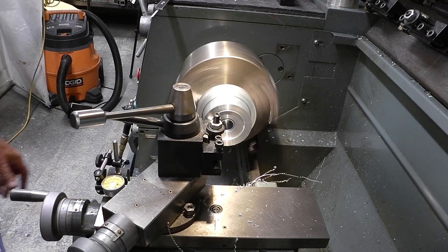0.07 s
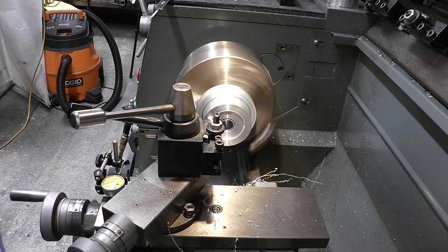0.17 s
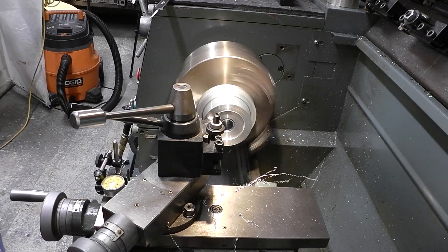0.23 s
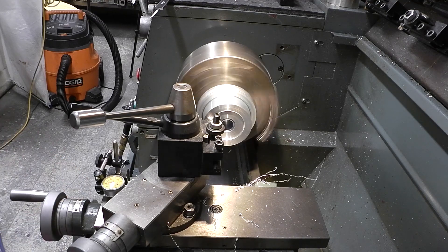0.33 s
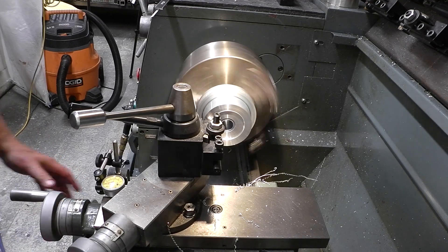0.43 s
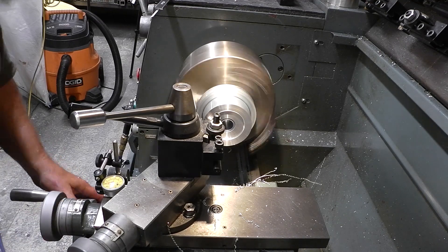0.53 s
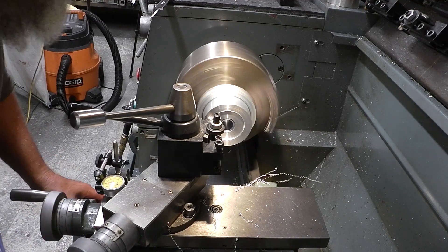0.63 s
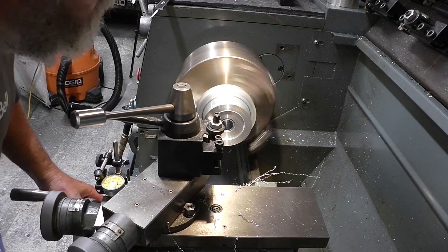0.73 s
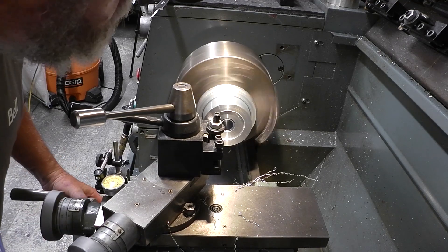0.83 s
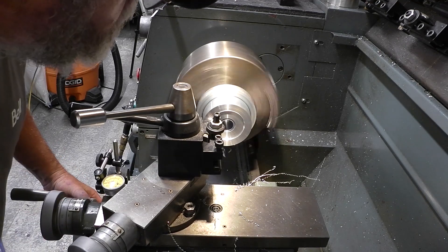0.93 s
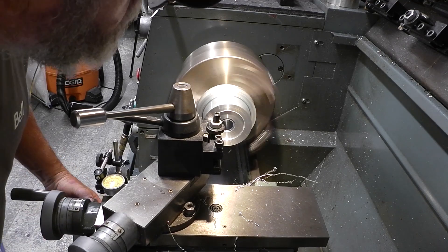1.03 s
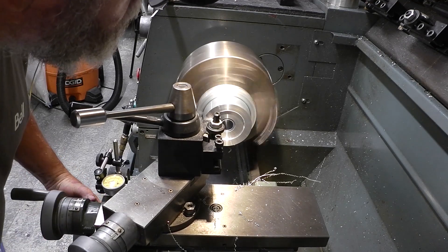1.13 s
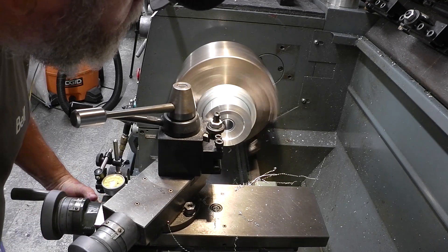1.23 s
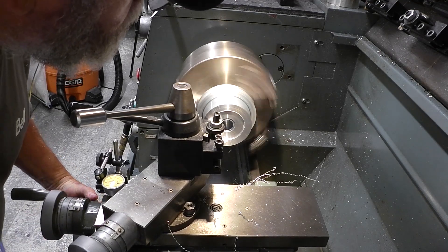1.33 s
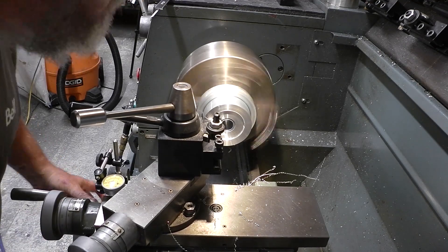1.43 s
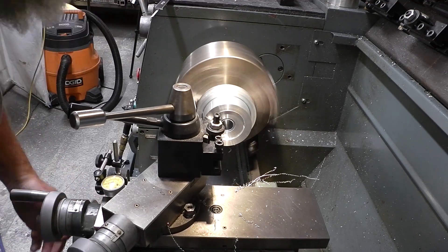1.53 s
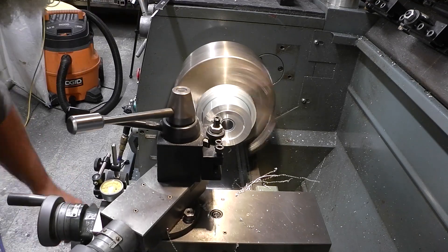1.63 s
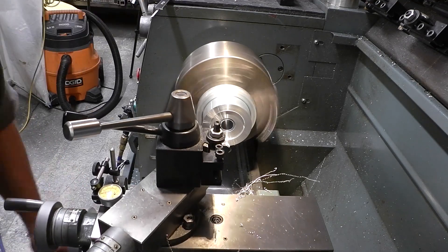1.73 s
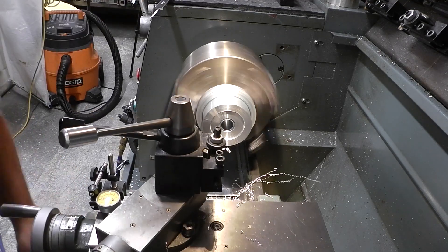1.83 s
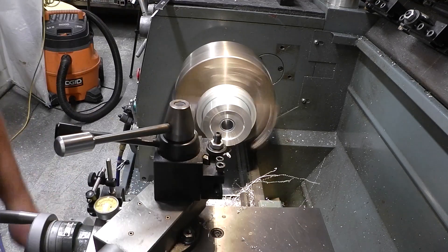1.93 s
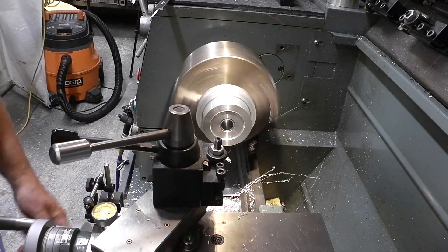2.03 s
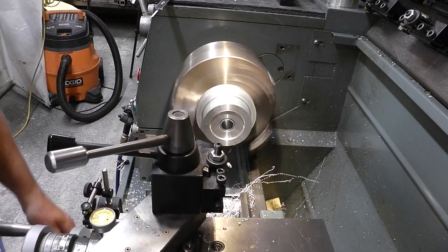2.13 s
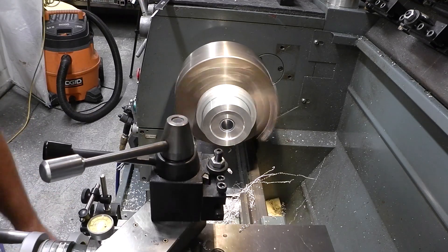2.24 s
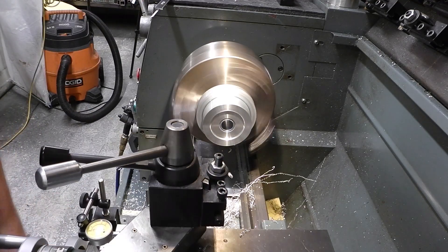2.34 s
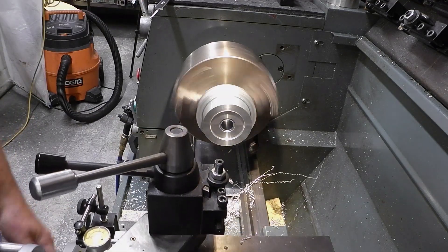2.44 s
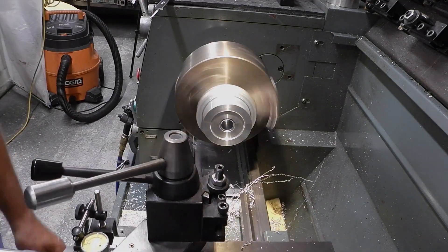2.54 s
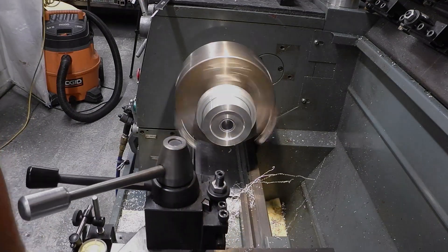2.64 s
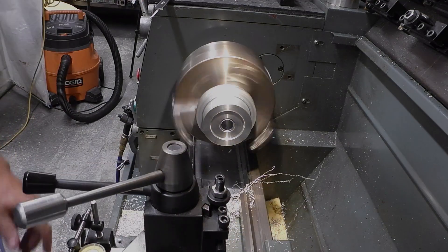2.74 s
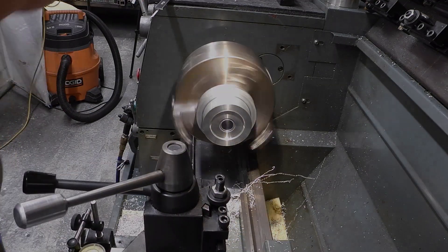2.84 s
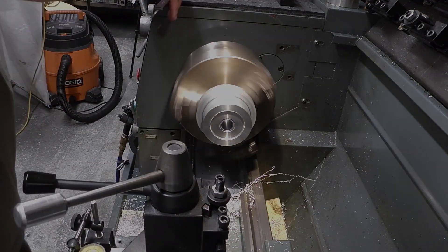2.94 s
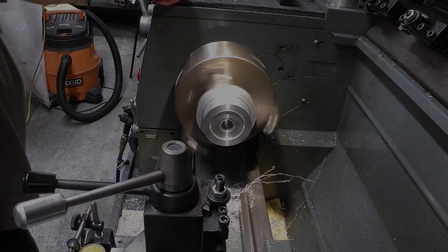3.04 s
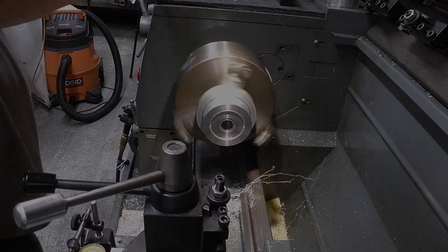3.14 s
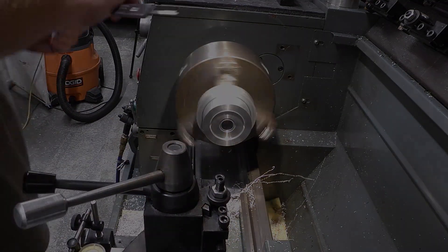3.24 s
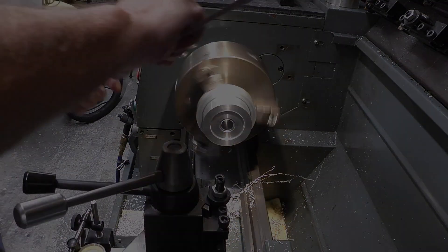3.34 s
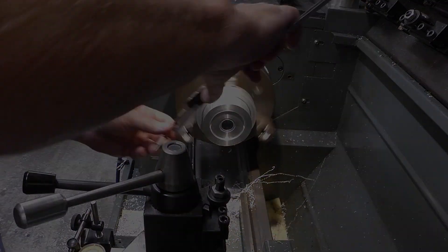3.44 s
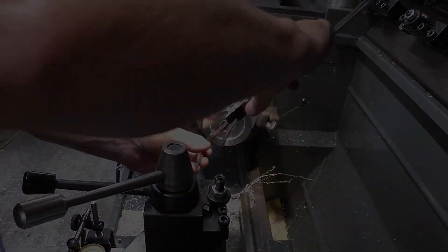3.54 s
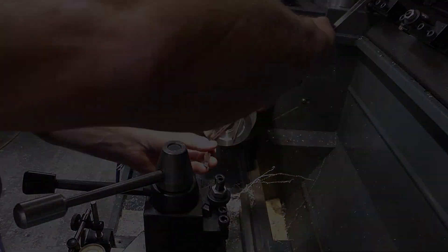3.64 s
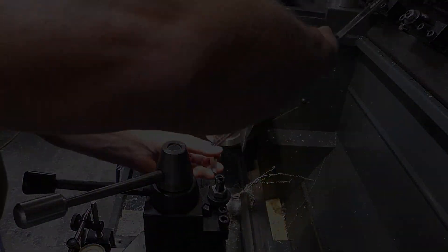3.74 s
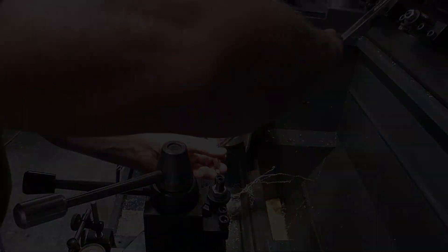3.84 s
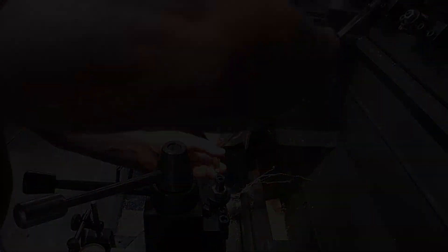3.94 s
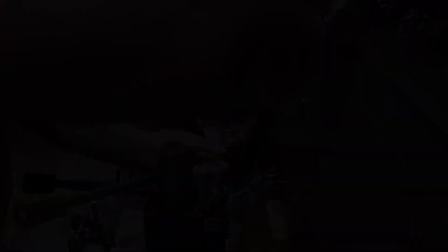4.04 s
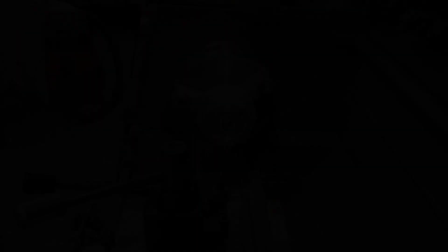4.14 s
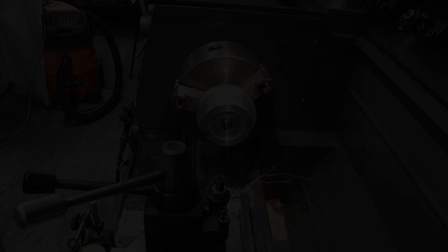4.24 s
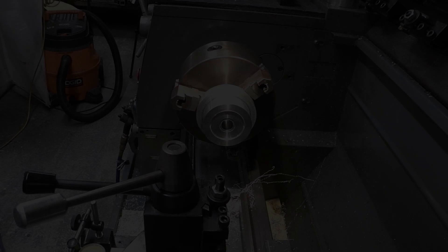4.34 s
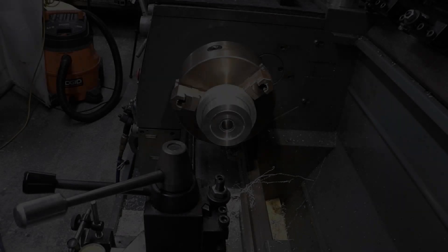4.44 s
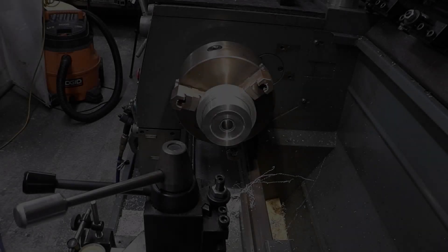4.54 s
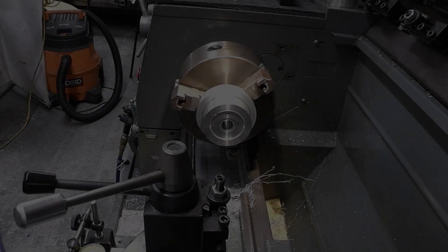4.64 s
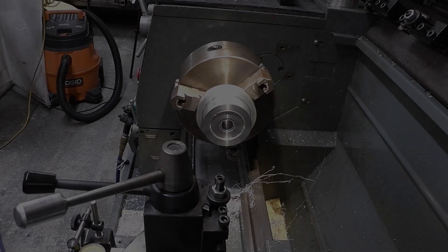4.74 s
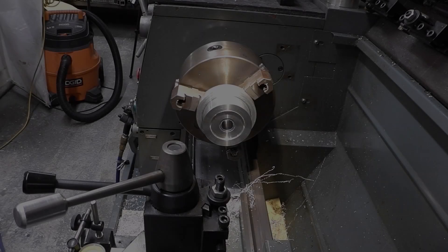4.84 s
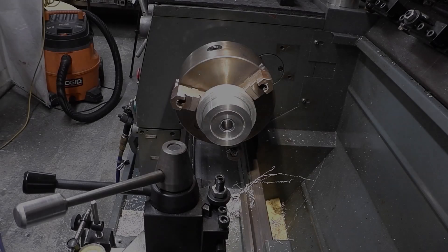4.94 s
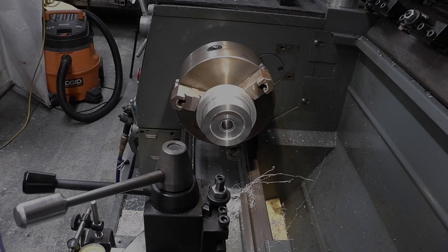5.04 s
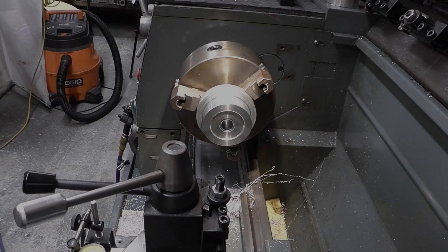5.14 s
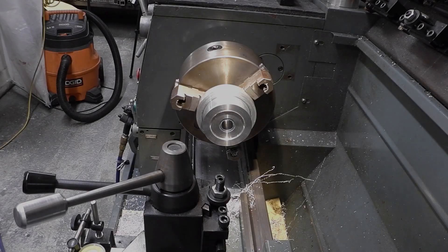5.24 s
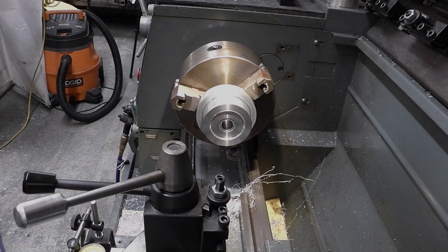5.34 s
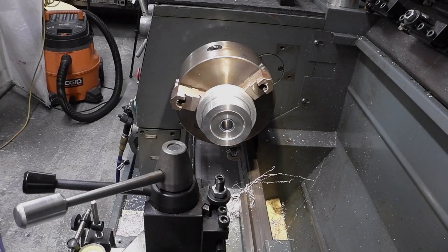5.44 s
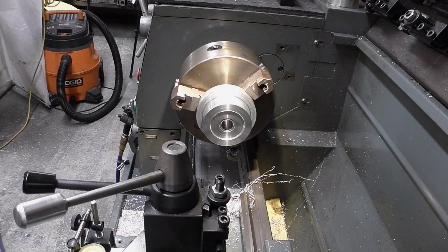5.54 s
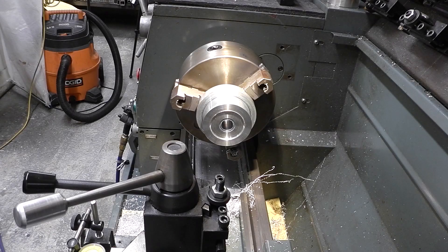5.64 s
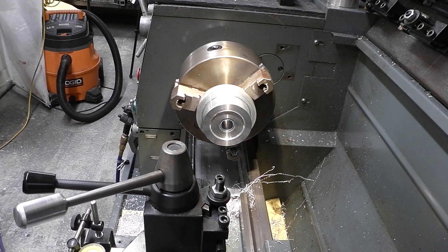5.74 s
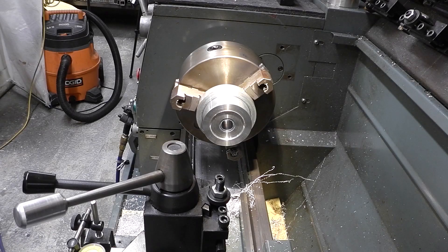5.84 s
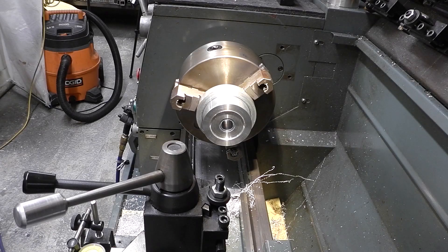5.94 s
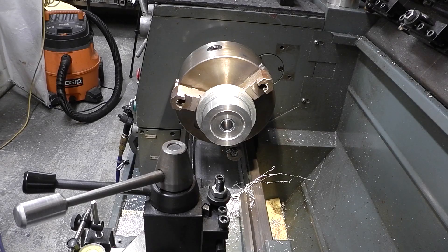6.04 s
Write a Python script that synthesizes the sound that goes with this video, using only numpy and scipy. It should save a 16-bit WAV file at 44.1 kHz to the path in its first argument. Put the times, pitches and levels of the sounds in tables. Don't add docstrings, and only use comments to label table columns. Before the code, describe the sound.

A close stereo view of a metal lathe in a workshop, in fast motion. From 0 to 0.55 s there is only faint air and low drone, with dry bright lever ticks growing denser and a small rough scrape near 0.2 s. At about 0.57-0.59 s a switch clunks and a clutch rings sharply. The motor strains, gears squeak and a rough pitch climbs quickly until 0.8 s. Then a steady, piercing whine around 3.7 kHz sits over bright cutting hiss, gear tones and a weak low hum. From 2.25 s it fades smoothly, reaching silence near 4.1 s. A very quiet buzzing room fades in. Light metal touches start around 4.5 s, a click at 4.94, then smeared clanks from 5.05, strongest at 5.29-5.45 s, with brief ringing and dull thumps. Soft low bench knocks follow at 5.68-5.91 s, leaving near quiet.

```python
import sys
import numpy as np
from scipy import signal
from scipy.fft import rfft, irfft, next_fast_len
from scipy.io import wavfile
from scipy.ndimage import uniform_filter1d, map_coordinates

SR = 44100
rng = np.random.default_rng(int(sys.argv[2]) if len(sys.argv) > 2 else 0)


def level_to_linear(level):
    exponent = np.asarray(level, float) / 20
    return 10 ** exponent


def put_to_file(sound):
    columns = np.atleast_2d(sound).T
    safe = np.clip(columns, -1, 1)
    whole_steps = np.round(safe * 32767)
    wavfile.write(sys.argv[1], SR, whole_steps.astype(np.int16))


N = 268693
TIME = np.arange(N) / SR
BEFORE, AFTER = (0, .6), (4.1, 6.1)  # s, the stretches before and after the cut
SWITCH_ON = .586
LEFT_RIGHT = np.array([[1], [-1]])


def unit(x):
    return x / np.sqrt(np.mean(x ** 2) + 1e-20)


def along(points, hz):
    f, v = np.transpose(points)
    return np.interp(np.log(hz + 1), np.log(f + 1), v)


def wobble(rate, size=N):
    coarse = np.arange(0, size + 32, 32)
    knots = rng.standard_normal(int(size * rate / SR) + 4)
    return np.interp(np.arange(size), coarse, map_coordinates(knots, [coarse * rate / SR]))


def filtered(x, response):
    m = next_fast_len(x.shape[-1] + 8192)
    return irfft(rfft(x, m) * response(np.fft.rfftfreq(m, 1 / SR)), m)[..., :x.shape[-1]]


def humps(peaks, hz):
    grid = np.arange(0, SR / 2, 5)
    level_db = sum(db / (1 + (2 * (grid - c) / w) ** 2) for c, w, db in peaks)
    return np.interp(hz, grid, level_to_linear(level_db + 0 * grid))


def length(span):
    return round((span[1] - span[0]) * SR)


def placed(x, span):
    out, start = np.zeros((2, N)), round(span[0] * SR)
    out[:, start:][:, :x.shape[-1]] = x[..., :N - start]
    return out


# pitch_hz, side_over_mid_db
LATHE_WIDTH = [(60, -2), (150, -1.5), (380, -10.5), (950, -11.5), (2380, -15.5), (5980, -16.5),
               (15000, -7.5)]


def rush(span, spectrum, peaks=(), patchy_db=3.5, ripple_db=3.0, width=LATHE_WIDTH):
    z = signal.stft(rng.standard_normal((2, length(span))), nperseg=256)[2]
    field = uniform_filter1d(rng.standard_normal(z.shape[1:]), size=3, axis=0)
    field = uniform_filter1d(field, size=10, axis=1)
    pair = signal.istft(z * level_to_linear(patchy_db * unit(field)), nperseg=256)[1]
    knots = rng.standard_normal(2000)

    def colour(hz):
        ripple = ripple_db * np.interp(hz / 14, np.arange(len(knots)), knots)
        return level_to_linear(along(spectrum, hz) + ripple) * humps(peaks, hz)

    mid, side = filtered(pair, lambda hz: colour(hz) * [1 + 0 * hz, level_to_linear(along(width, hz))])
    return placed(np.array([mid + side, mid - side]) / np.std(mid), span)


def tones(span, lines, sway_db, drift_hz, bend=1):
    out, n = 0, length(span)
    for hz, db in lines:
        turns = np.cumsum(hz * bend + drift_hz * wobble(14, size=n)) / SR
        gain = level_to_linear(db + sway_db * wobble(18, size=n))
        out = out + gain * np.sin(2 * np.pi * turns) * level_to_linear(rng.normal(0, .25) * LEFT_RIGHT)
    return placed(np.sqrt(2) * out, span)


def stroke(s, db, rise, hold, fall):
    out, first = np.zeros(N), round((s - abs(rise)) * SR)
    t = np.arange(first, min(first + SR * 3 // 4, N)) / SR - s
    gain = np.clip(1 + t / abs(rise), 0, 1) ** 2.6 * level_to_linear(db - fall * np.clip(t - hold, 0, 1))
    out[first:first + len(t)] = gain
    return out


def contact(s, db, hz, octaves, ring_share, thud_db):
    t = np.arange(8192) / SR
    f = np.fft.rfftfreq(len(t), 1 / SR) + 1
    noise = rng.standard_normal((4, len(t)))
    bell = np.exp(-.5 * (np.log2(f / hz) / octaves) ** 2)
    band = unit(irfft(rfft(noise[0] + 0.76 * noise[2:]) * bell, len(t)))
    crack = (0.51 * level_to_linear(-60 * t / 0.0086) + .1 * level_to_linear(-60 * t / 0.16)) * band
    ring = np.clip(ring_share, 0, 1) * level_to_linear(-60 * t / 0.025) * np.sin(2 * np.pi * hz * t)
    dull = signal.butter(2, [250, 1300], "bandpass", fs=SR, output="sos")
    thud = level_to_linear(thud_db + 13.5 - 60 * t / 0.11) * signal.sosfilt(dull, noise[1])
    return placed(level_to_linear(db) * (crack + ring + thud), (s, s))


def brief_tones(rows):
    out, n = np.zeros((2, N)), SR // 4
    t = np.arange(n) / SR
    for s, hz, db, hold in rows:
        rise = .008 + 5.99 / hz
        fall_db = 390 * np.clip(t - rise - hold, 0, 1)
        gain = np.clip(t / rise, 0, 1) ** 2 * level_to_linear(db - fall_db + 3.7 * wobble(150, size=n))
        turns = np.cumsum(hz * (1 + .009 * wobble(120, size=n))) / SR
        wave = np.sin(2 * np.pi * turns + rng.normal(0, .2) * LEFT_RIGHT)
        out += placed(gain * wave * np.sqrt(2), (s - rise, s))
    return out


# pitch_hz, level_db_per_hz
AIR_COLOUR = [
    [(120, -42.5), (200, -10), (316, 1), (519, -8.5), (635, 0.5), (836, -11), (1940, -6.5), (3370, -15.5),
     (10700, -19), (16000, -17.5)],
    [(120, -15), (200, -10), (249, -7), (519, -7), (590, -12), (647, -8.5), (1120, -11), (6880, -17.5),
     (14300, -26.5), (16000, -37)],
]
# pitch_hz, level_db_per_hz
DRONE_COLOUR = [
    [(15, -59), (25, -26.5), (102, -29), (162, -5.5), (251, -14), (343, -1), (447, -16.5), (500, -15),
     (650, -47.5), (1100, -120)],
    [(15, -45), (25, -7), (97, -3.5), (146, -8), (193, -8.5), (257, -13.5), (292, -16), (400, -20),
     (520, -61), (880, -120)],
]
# pitch_hz, level_over_drone_db
MAINS_BUZZ = [(103, -6.5), (198, -7)]


def shop():
    wide = [(100, -9.0), (3000, -6.0), (12000, -3.0)]  # pitch_hz, side_over_mid_db
    since_start = TIME.clip(0, 1)
    air = rush(BEFORE, AIR_COLOUR[0], [(2200, 300, 2.8), (8300, 300, 3)], width=wide)
    drone = rush(BEFORE, DRONE_COLOUR[0], width=wide)
    early = level_to_linear(-73.4 + 12.5 * since_start) * air + level_to_linear(-76 + 15.5 * since_start) * drone
    late_air = rush(AFTER, AIR_COLOUR[1], patchy_db=1.8, width=wide)
    buzz = tones(AFTER, MAINS_BUZZ, sway_db=5, drift_hz=9)
    late_drone = rush(AFTER, DRONE_COLOUR[1], width=wide) + buzz
    fade_in = np.clip((TIME - 4.135) / 2.2, 0, 1)
    return early + fade_in * (level_to_linear(-66) * late_air + level_to_linear(-67) * late_drone)


# start_s, peak_db, pitch_hz
BENCH_KNOCKS = [
    (5.6843, -43, 990),
    (5.694, -48, 1260),
    (5.793, -54, 1220),
    (5.875, -52, 1010),
    (5.911, -48, 1360),
]


def knocks():
    return sum(contact(*row, octaves=0.32, ring_share=0.49, thud_db=-15.5) for row in BENCH_KNOCKS)


# start_s, peak_db, pitch_hz
PART_TOUCHES = [(4.477, -69, 5550), (4.6778, -52, 5640), (4.8117, -61, 5500), (4.8354, -64, 5500),
                (4.914, -50, 5630), (4.9345, -48, 4500), (4.939, -37, 6500), (5.2872, -25.5, 5900),
                (5.2905, -22, 6200), (5.348, -27, 4000), (5.409, -29, 3600), (5.445, -33, 3400),
                (5.668, -56, 5400), (5.743, -60, 7500)]


def touches():
    out = 0
    for s, db, hz in PART_TOUCHES:
        thud_db = -74.5 + 0.48 * (db + 50) - db
        out = out + contact(s, db, hz, octaves=0.65, ring_share=0.11, thud_db=thud_db)
    return out


# clank_peak_s, body_db, clank_over_body_db, thump_over_body_db, rise_s
SMEARED_BLOWS = [(4.485, -70, -9, -21, 0.045), (4.675, -60, -9.5, -24, 0.11),
                 (4.82, -70.5, -18, -12, 0.071), (4.936, -53.5, -4.5, -24, 0.0081),
                 (5.058, -41.5, 4, -22, 0.0078), (5.1, -47, 2, -26, 0.038), (5.165, -51.5, -3, -14, .03),
                 (5.243, -46, 0, -11, 0.022), (5.288, -42, 8.5, -14, 0.004),
                 (5.332, -38.5, 1.5, -6.5, 0.13), (5.389, -43, 1, -5.5, 0.053), (5.67, -67.5, -3, 2, 0.014),
                 (5.738, -66, -1.5, -12, 0.041), (5.79, -66, -6, -14, .04), (5.86, -62.5, -1.5, -15, 0.081),
                 (5.91, -70, 0.5, -9, 0.043)]
# pitch_hz, level_db_per_hz
CLANK_COLOUR = [(2800, -60), (3700, -15), (4250, -5.5), (5500, -4.5), (7500, -4.5), (11000, -9),
                (15800, -23)]
BODY_COLOUR = [(310, -42), (540, -16), (800, -3.5), (1360, -3.5), (2500, -2.5), (3600, -6.5), (4200, -8.5),
               (5200, -35.5)]
THUMP_COLOUR = [(100, -50), (180, -20), (250, -15), (310, -1.5), (480, -4), (640, -4), (830, -33.5)]
# pitch_hz, side_over_mid_db
BLOW_WIDTH = [(60, -12), (180, -15), (550, -14), (1100, -15), (1900, -16.5), (4970, -7.5), (15000, 3)]
# pitch_hz, width_hz, level_db
PART_RESONANCES = [
    [(820, 89, -0.5), (1510, 580, 3.5), (2600, 280, 3), (3870, 120, 2), (5000, 270, 6), (7640, 200, -2),
     (8800, 250, 6)],
    [(963, 30, 9), (1255, 89, 5), (2220, 50, 3), (2550, 200, 3), (700, 110, 4), (3670, 720, 8),
     (4440, 76, 7), (4900, 50, 6.5), (5900, 120, 2), (7150, 90, 1), (8550, 120, 6)],
    [(490, 40, 15), (963, 46, 7.5), (1290, 810, 10), (2120, 73, 6), (5000, 200, 7), (5970, 1000, 5.5)],
]


def blows():
    lags_s, falls = (0, 0.023, 0.03), (133, 106, 113)
    power = np.zeros((3, N))
    for s, db, clank_db, thump_db, rise in SMEARED_BLOWS:
        lighter = 2.8 * max(-41.5 - db, 0)
        for k, over_db in enumerate((clank_db, 0, thump_db)):
            rise_s = rise + lags_s[k] * 0.37
            power[k] += stroke(s + lags_s[k], db + over_db, rise_s, 0.013, falls[k] + lighter) ** 2
    bright, full, low = np.sqrt(power)
    grit = 0.5 * wobble(97) + 0.9 * wobble(400)
    clank = rush(AFTER, CLANK_COLOUR, patchy_db=1.0, ripple_db=1.8, width=BLOW_WIDTH)
    body = rush(AFTER, BODY_COLOUR, patchy_db=2.0, ripple_db=1.7, width=BLOW_WIDTH)
    thump = rush(AFTER, THUMP_COLOUR, [(380, 40, 2.8), (485, 25, 3)], patchy_db=2.5, ripple_db=4.0,
                 width=BLOW_WIDTH)
    struck = bright * level_to_linear(grit - 1.5) * clank + full * level_to_linear(0.52 * grit - 2.0) * body
    out = low * level_to_linear(-1.0) * thump
    start = round(AFTER[0] * SR)
    in_hand = np.searchsorted((5.23, 5.66), np.arange(start, N) / SR)
    for k, part in enumerate(PART_RESONANCES):
        out[:, start:] += filtered((in_hand == k) * struck[:, start:], lambda hz: humps(part, hz))
    return out * level_to_linear(.3 * LEFT_RIGHT)


# full_level_s, pitch_hz, level_db, hold_s
SINGING_MODES = [(4.946, 4950, -62, .004), (4.968, 1617, -60, 0.026), (4.966, 1200, -60, 0.011),
                 (4.972, 780, -64.5, .01), (4.7, 2200, -63, 0.0091), (4.84, 1900, -73.5, .02),
                 (5.085, 1900, -53, .015), (5.09, 850, -58, .02), (4.96, 3600, -69, 0.017),
                 (5.081, 2600, -54, .04), (5.11, 109, -65.5, .03), (5.062, 9500, -49, .04),
                 (5.065, 8200, -50, 0.036), (5.24, 6850, -54, .015), (5.245, 8000, -51, .02),
                 (5.286, 5900, -44, 0.0097), (5.295, 4100, -46.5, .03), (5.292, 116, -64, .03),
                 (5.316, 3764, -41.5, 0.042), (5.351, 962, -44.5, 0.039), (5.359, 372, -50, 0.024),
                 (5.369, 311, -51, 0.046), (5.396, 3400, -44.5, 0.018), (5.411, 3700, -49, 0.031),
                 (5.4, 2516, -52, .04), (5.43, 480, -51, 0.024), (5.625, 195, -68, .04),
                 (5.69, 205, -65, 0.014), (5.6, 1060, -72, 0.079), (5.56, 1100, -65, .03),
                 (5.1, 3400, -51, .008), (5.165, 1620, -59, .015), (5.19, 950, -62, .015),
                 (5.535, 3700, -58, .012), (5.49, 350, -57, .02), (5.805, 200, -67, .02),
                 (5.4, 215, -63, .04), (5.29, 300, -57, 0.033), (5.885, 1000, -64, .015),
                 (5.688, 353, -67.5, 0.027), (5.69, 495, -70, 0.024)]


def singing():
    return brief_tones(SINGING_MODES)


# start_s, peak_db, pitch_hz, spread_octaves, ring_share
LEVER_TICKS = [(0.045, -62, 12000, .5, 0), (0.053, -58, 4270, 0.33, .05), (.07, -48, 5000, 2, 0),
               (.091, -49, 8500, 0.64, 0), (0.131, -56.5, 4400, 0.42, 0.34), (.155, -61, 10000, .6, .1),
               (.1915, -52, 8600, .3, .3), (.1994, -53, 8500, .3, .3), (0.2182, -41.5, 8150, 0.66, 0.6),
               (0.238, -39, 7330, 1.7, 0.25), (.322, -53, 13940, .4, 0), (0.328, -41.5, 8330, 1.2, 0.24),
               (.3746, -60, 8250, .3, .6), (0.4026, -42.5, 11000, 1.6, 0.1), (.409, -37.5, 7770, 1.3, 0.5),
               (0.472, -55, 13500, 1.2, 0.4), (0.483, -52.5, 7800, .8, .4), (0.5253, -46.5, 7650, 1.3, 1),
               (0.555, -42.5, 8200, 1.1, 0.3), (0.5653, -34, 4680, 0.95, 0.4),
               (0.57, -35.5, 8120, 1.4, 0.65)]


def levers():
    return sum(contact(*row, thud_db=-25) for row in LEVER_TICKS)


# pitch_hz, level_db_per_hz
SLIDE_COLOUR = [(880, -47.5), (1500, -18), (1700, -10), (2880, -9), (4000, -14), (6000, -15), (8320, 0),
                (10100, -6.5), (16000, -8.5)]


def lever_scrape():
    noise = rush(BEFORE, SLIDE_COLOUR, [(8450, 700, 4.4), (4670, 400, 5), (2600, 300, 3)], patchy_db=3)
    return stroke(.194, -54.5, rise=.017, hold=.05, fall=300) * level_to_linear(1.9 * wobble(120)) * noise


# (pitch_hz, level_db, fall_by_60_db_s)
CLUNK_MODES = [
    (0.565, -41, 0.0031, [(250, -4.5, .09), (615, 3, .07), (820, 3.5, .05), (1740, -4.5, .05)]),
    (0.5886, -26.5, 0.004, [(3698, 3, 0.05), (3610, -11, .05), (2915, -9, .15), (3330, -25, .04)]),
]


def clunks():
    out, t = np.zeros((2, N)), np.arange(SR // 3) / SR
    for s, db, rise, modes in CLUNK_MODES:
        ring = sum(level_to_linear(level - 60 * t / t60) * np.sin(2 * np.pi * hz * t) for hz, level, t60 in modes)
        out += placed(level_to_linear(db) * (1 - np.exp(-t / rise)) * ring, (s, s))
    return out


# full_level_s, pitch_hz, level_db, hold_s
GEAR_SQUEAKS = [(.515, 2300, -73, .012), (.54, 800, -68, .004), (.575, 1500, -55, .01),
                (.59, 2000, -55, .006), (.594, 2915, -54, .02), (.622, 1960, -54, .012),
                (.664, 2850, -57, .004), (.681, 3690, -50, .003), (.7, 2450, -58, .006),
                (.715, 1380, -55, .006), (.733, 3680, -44, .006), (.733, 1490, -52, .006),
                (.79, 1920, -54, .006), (.777, 4900, -52, .005), (.803, 4800, -50, .005)]


def squeaks():
    return brief_tones(GEAR_SQUEAKS)


# time_s, mesh_hz, mesh_db
MESH_CLIMB = [
    (.6, 553, -82.5),
    (.63, 700, -68),
    (.65, 797, -68),
    (.70, 1150, -60),
    (.735, 1480, -47),
    (.76, 1600, -53),
    (.79, 1880, -50.5),
    (.815, 1950, -79),
]


def gear_mesh():
    s, hz, db = np.transpose(MESH_CLIMB)
    mesh_hz, mesh_db = [np.interp(TIME, s, column, -150, -150) for column in (hz, db)]
    turns = np.cumsum(mesh_hz) / SR
    orders = (1, .76, .88)
    rough = sum((.6 + .7 * wobble(140)) * np.sin(2 * np.pi * order * turns) for order in orders)
    return level_to_linear(mesh_db - 4) * rough


# time_s, load_0_to_1
LOAD_CURVE = [
    (.586, 1),
    (.61, 0.9),
    (.65, 0.1),
    (.67, 0.84),
    (.74, 0.73),
    (.80, 0.5),
    (.835, 0),
    (.9, 0.12),
]


def motor_load():
    return np.interp(TIME, *np.transpose(LOAD_CURVE))


# pitch_hz, level_db at a load of 1.5, lost_db per unit of load below that
STRAIN_TONES = [(1120, -62, 3), (1857, -55, 3), (2229, -66, 2), (2719, -63, 2), (2825, -58, 5),
                (3215, -51.5, 1), (3604, -49.5, 4), (3661, -58, 2), (3700, -47, 1), (3903, -63, 1),
                (3994, -63, 1), (4086, -63, 1), (4382, -57, 2), (4845, -63, 1)]


def motor_strain():
    span, load = (.5 + .05, .85), motor_load()
    straining = (TIME > SWITCH_ON) * np.clip((.784 - TIME) / .006, 0, 1)
    bend = np.interp(span[0] + np.arange(length(span)) / SR, (.715, .76), [1, 1 - .005])
    out = 0
    for hz, db, lost_db in STRAIN_TONES:
        tone = tones(span, [(hz, .3)], sway_db=1.0, drift_hz=3.0, bend=bend)
        out = out + level_to_linear(db - lost_db * (1.5 - load)) * tone
    return straining * out


# pitch_hz, level_db
GEAR_TONES = [(780, -76.5), (1485, -67.5), (1561, -72), (1669, -77), (1852, -74), (1927, -74),
              (2189, -70.5), (2238, -75), (2905, -66.5), (3295, -71), (3335, -71), (3503, -64), (3782, -69),
              (3862, -68), (4377, -60), (4452, -62.5), (5007, -58.5), (5044, -66), (5253, -64.5),
              (5937, -61.5), (6105, -70), (6519, -66), (7004, -63.5), (7247, -64), (7418, -69.5),
              (8258, -68), (8753, -68.5), (11284, -68), (12016, -75.5)]
# pitch_hz, level_db_per_hz
HISS_COLOUR = [(1900, -36), (3200, -29.5), (3560, -12.5), (4000, -11.5), (4920, -6), (5670, -9),
               (7280, -8.5), (9500, -8.5), (11600, -11), (14000, -16), (15800, -18)]
RUMBLE_COLOUR = [(20, -39), (70, -34), (150, -32), (320, -21), (390, -20.5), (490, -27.5), (580, -23.5),
                 (780, -21), (1000, -22.5), (1500, -15.5), (3100, -15.5), (3600, -11.5), (4300, -19),
                 (5500, -44)]
# pitch_hz, width_hz, level_db
CASING_RESONANCES = [(3853, 230, -0.5), (4350, 210, 4), (4910, 360, 2.5), (7130, 400, 3), (8930, 700, 1.5),
                     (1150, 180, 4.5), (2190, 100, 1), (4530, 60, 2.5), (5065, 70, 4), (5310, 50, 4),
                     (6200, 330, 3), (584, 36, 3.5), (1520, 55, 1),
                     (440, 15, 3.5), (522, 25, -3.5), (564, 14, 4.5), (640, 14, 1.5), (673, 10, 4.5),
                    (686, 12, -9), (705, 12, 4.5), (815, 16, 2.5), (870, 16, 2), (923, 20, 3),
                    (964, 50, -3.5), (1104, 25, 5.5), (1168, 13, 3), (1253, 30, 4), (1293, 44, -7),
                    (1320, 14, 4.5), (1480, 30, 4), (1610, 14, 5), (1615, 14, -6), (1740, 30, 5),
                    (1910, 33, 7.5), (2040, 70, -3), (2280, 30, 2), (2483, 30, 6), (2680, 24, 5.5),
                    (2740, 24, 5.5), (2970, 16, 2.5), (3060, 120, -2.5), (3210, 30, 4), (3470, 80, -3.5),
                    (3600, 24, 4), (3645, 33, 5), (3746, 18, 1.5), (4300, 40, 2), (4475, 40, 3.5),
                    (4526, 16, 3), (4610, 80, -1.5), (4760, 40, 3.5), (4820, 16, 2.5), (4950, 20, 5.5),
                    (5340, 24, 6), (5560, 50, -4)]
# pitch_hz, left_over_right_db
LATHE_LEAN = [(60, -2.5), (180, -0.5), (550, -2), (1650, -4), (4970, -3.5), (15000, 0)]


def lathe():
    span, load = (.5, 4.15), motor_load()
    on = np.clip((TIME - SWITCH_ON) / 0.0034, 0, 1)
    speed = np.clip((TIME - .7) / 0.19, 0, 1)
    slow = np.clip((0.747 - TIME) / (0.747 - 0.56), 0, 1)
    cut_db = .5 * wobble(9)
    cutting = on * level_to_linear(-42.5 - 18.5 * slow + 1.5 * load + cut_db)
    gearbox = on * level_to_linear(-52.5 + 5 * load + 0.67 * cut_db)
    hiss_burst = stroke(.571, -41, rise=.014, hold=0, fall=900)
    rumble_burst = stroke(.571, -45, rise=.014, hold=0, fall=450)
    chatter = level_to_linear(0.34 * wobble(30.08) + 0.94 * wobble(110))
    peaks = CASING_RESONANCES
    hiss = (cutting + hiss_burst) * chatter * rush(span, HISS_COLOUR, peaks, patchy_db=1.0, ripple_db=1.7)
    rumble = (gearbox + rumble_burst) * rush(span, RUMBLE_COLOUR, peaks, patchy_db=1.5, ripple_db=.8)
    whine_gain = level_to_linear(-46 + 3.5 * load + 0.8 * wobble(13)) * np.clip((TIME - .781) / 0.0072, 0, 1)
    whine = whine_gain * tones(span, [(3684, -.3)], sway_db=0.16, drift_hz=2.4)
    hum_gain = on * level_to_linear(-62.5 + 8 * load + .4 * wobble(10))
    hum = hum_gain * tones(span, [(389.9, -.3)], sway_db=0.3, drift_hz=0.6)
    gears = level_to_linear(43.5) * cutting * speed * tones(span, GEAR_TONES, sway_db=3, drift_hz=1.8)
    fade_out = np.clip((4.13 - TIME) / (4.13 - 2.25), 0, 1)
    sound = fade_out * (hiss + rumble + whine + hum + gears)
    return filtered(sound, lambda hz: level_to_linear(along(LATHE_LEAN, hz) * .4 * LEFT_RIGHT))


def scene():
    parts = knocks() + touches() + blows() + singing()
    starting = levers() + lever_scrape() + clunks() + squeaks() + gear_mesh() + motor_strain()
    return shop() + parts + starting + lathe()


def roll_off(x):
    return signal.sosfilt(signal.butter(12, 16620, fs=SR, output="sos"), x)


# pitch_hz, level_db
FAINTEST_KEPT = [(5000, -138), (9700, -127), (10100, -120), (12700, -118), (12900, -110), (15800, -110)]


def record(dry):
    hz, _, z = signal.stft(dry, SR, nperseg=1024)
    power = uniform_filter1d(np.mean(abs(z) ** 2, axis=0), size=12, axis=0)
    power = uniform_filter1d(power, size=3, axis=1)
    audible = abs(power) > level_to_linear(2 * along(FAINTEST_KEPT, hz))[:, None]
    top = np.where(hz < 15870, 1, .002)
    bass = 1 / np.sqrt(1 + (19 / (hz + 10)) ** 2)
    heard = signal.istft(z * audible * (top * bass)[:, None], SR, nperseg=1024)[1][:, :N]
    return roll_off(heard)


dry = scene()
out = record(dry)
put_to_file(out)
```